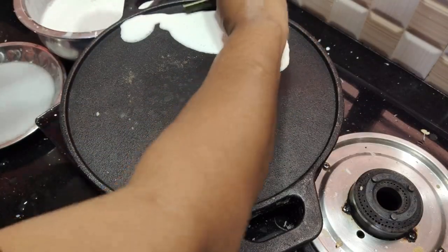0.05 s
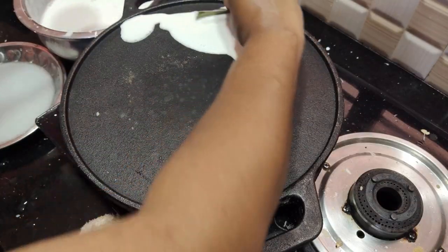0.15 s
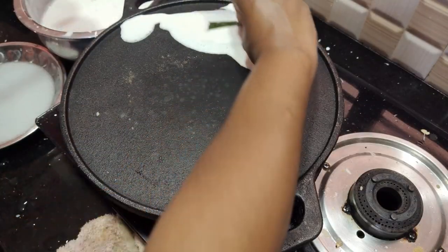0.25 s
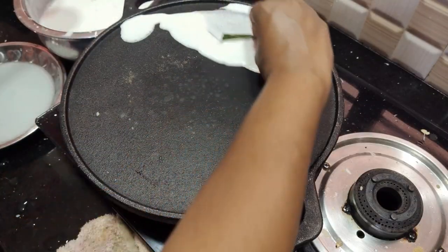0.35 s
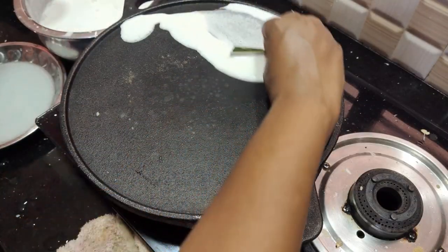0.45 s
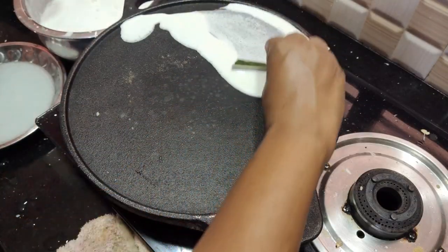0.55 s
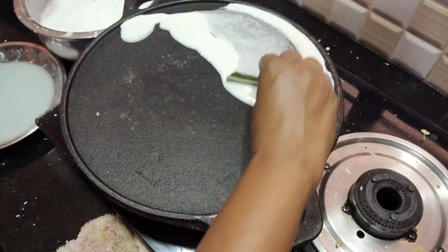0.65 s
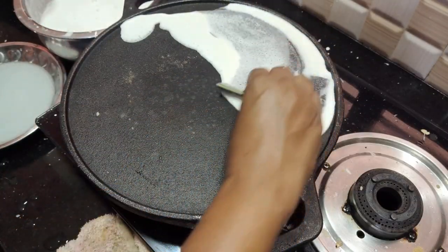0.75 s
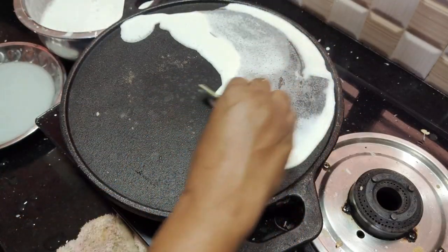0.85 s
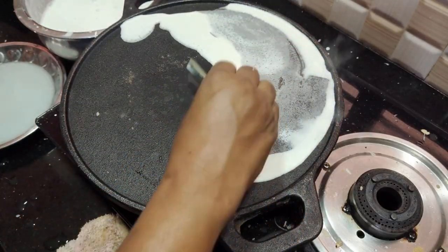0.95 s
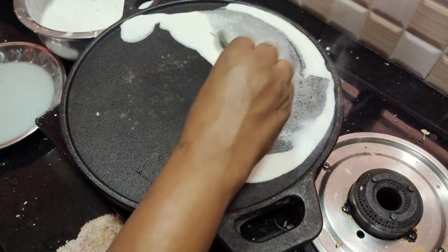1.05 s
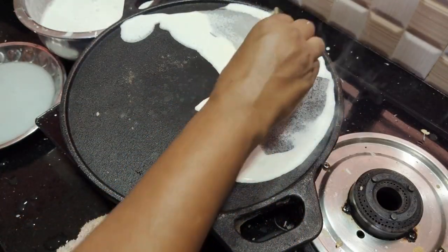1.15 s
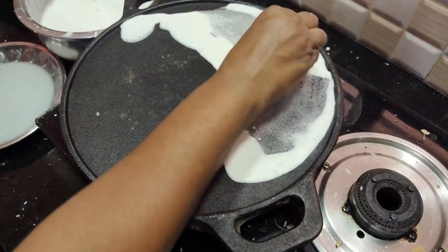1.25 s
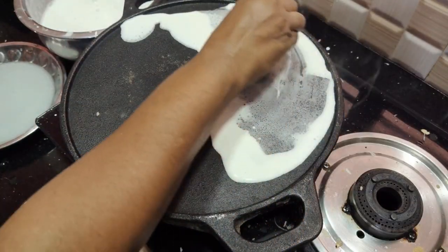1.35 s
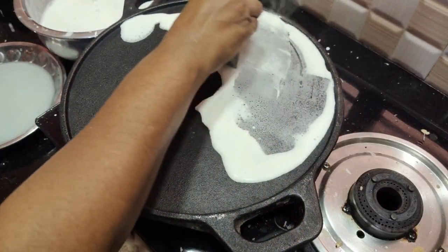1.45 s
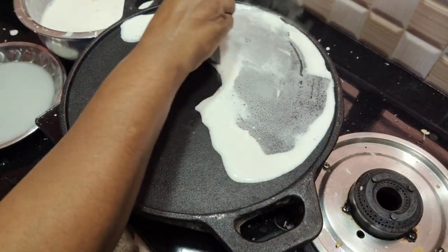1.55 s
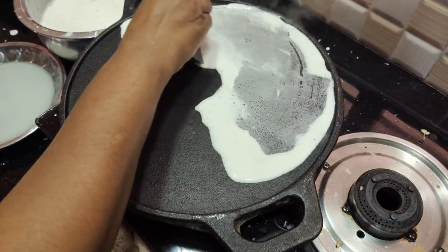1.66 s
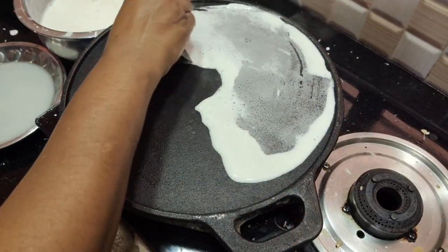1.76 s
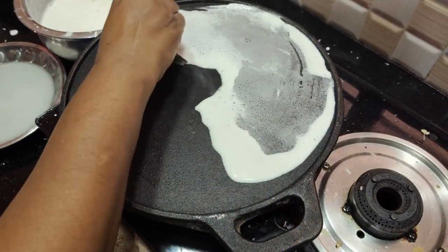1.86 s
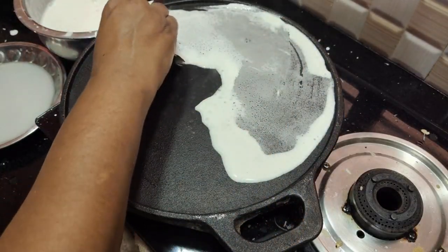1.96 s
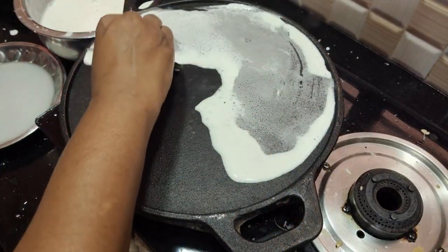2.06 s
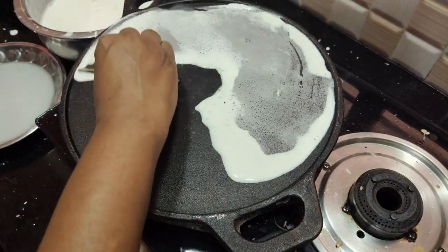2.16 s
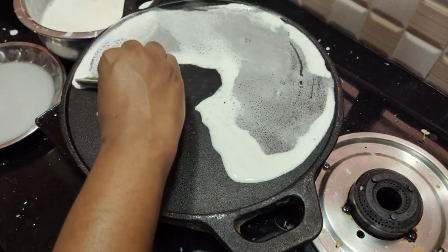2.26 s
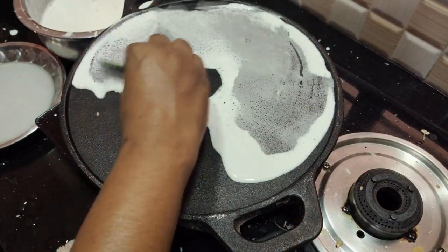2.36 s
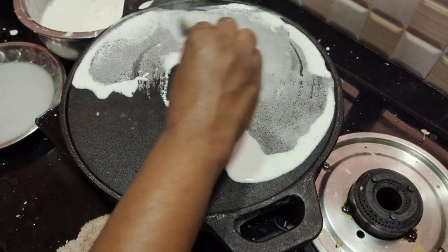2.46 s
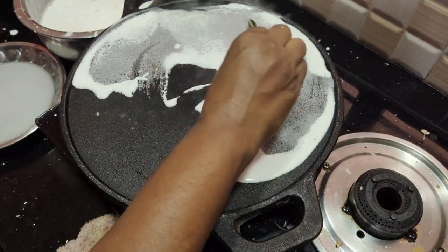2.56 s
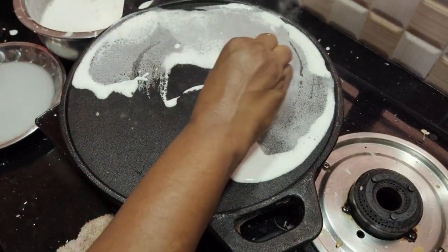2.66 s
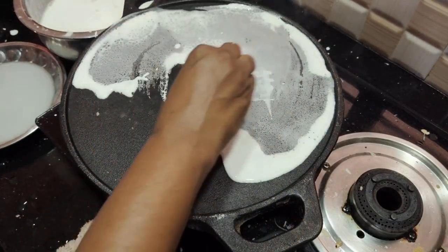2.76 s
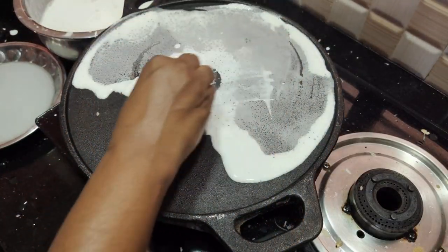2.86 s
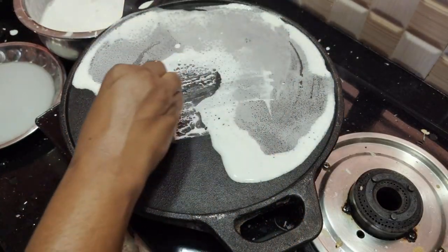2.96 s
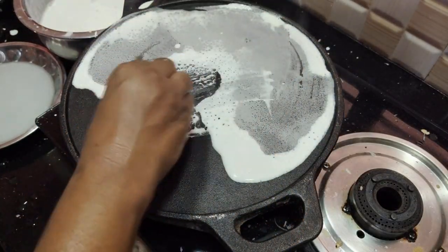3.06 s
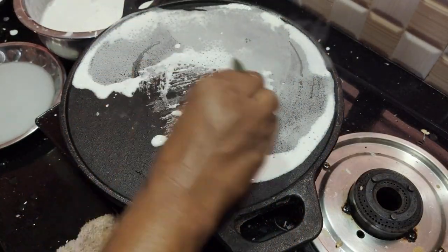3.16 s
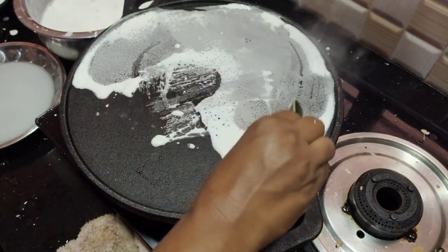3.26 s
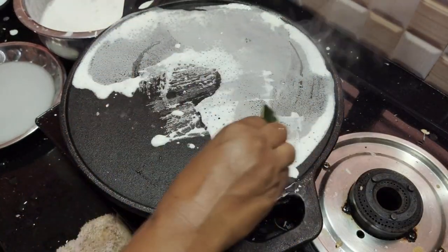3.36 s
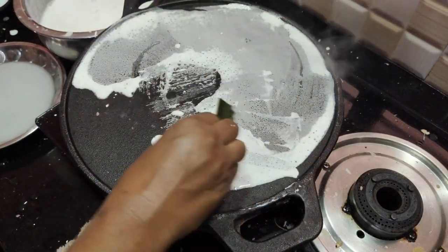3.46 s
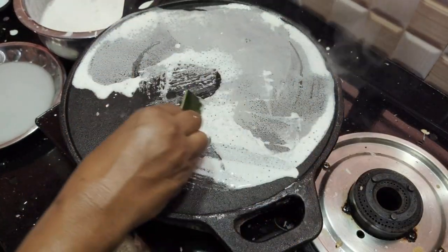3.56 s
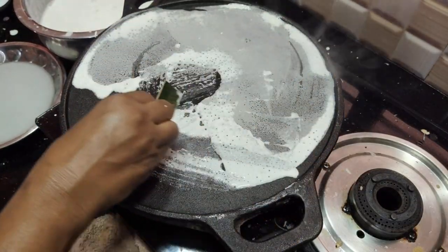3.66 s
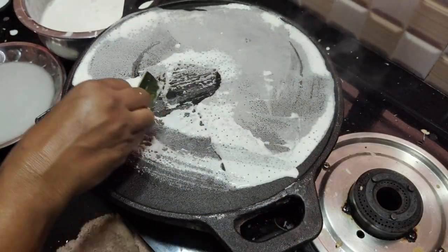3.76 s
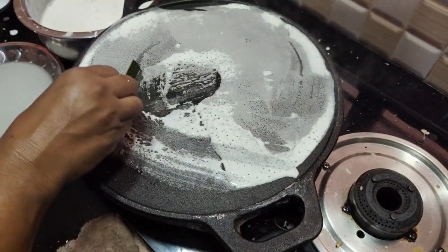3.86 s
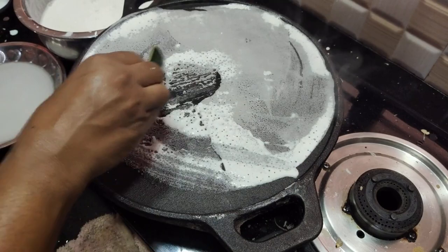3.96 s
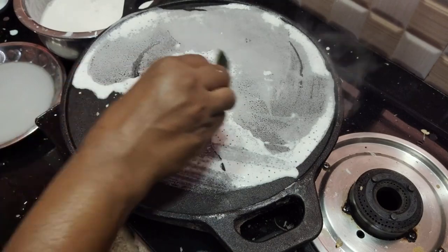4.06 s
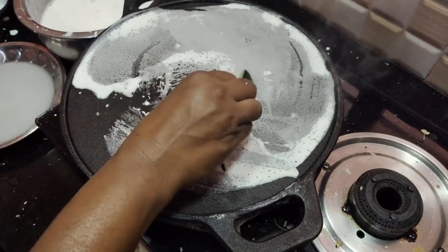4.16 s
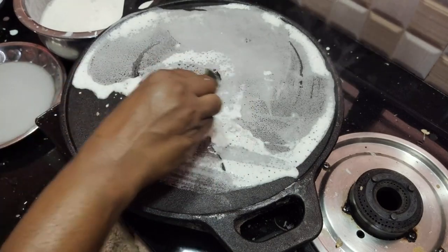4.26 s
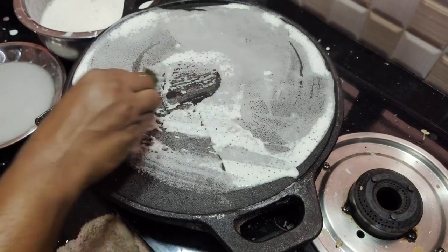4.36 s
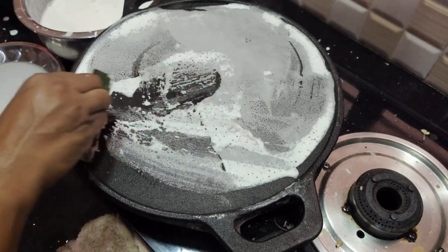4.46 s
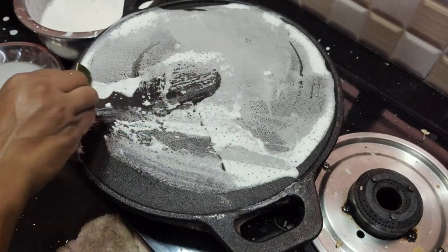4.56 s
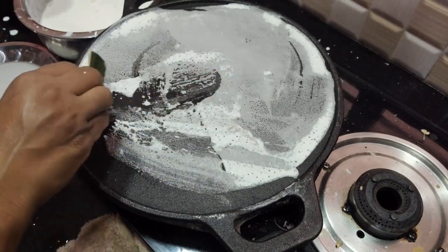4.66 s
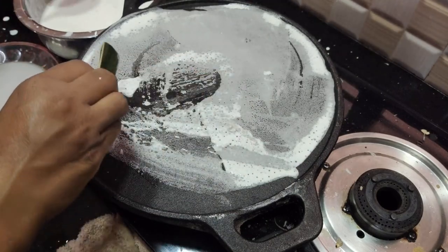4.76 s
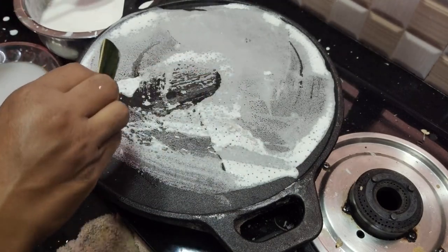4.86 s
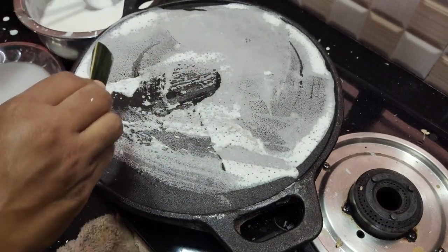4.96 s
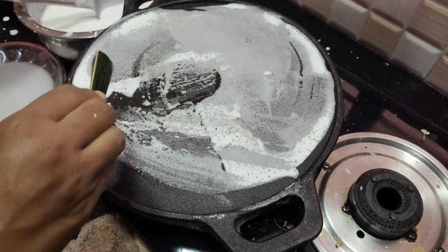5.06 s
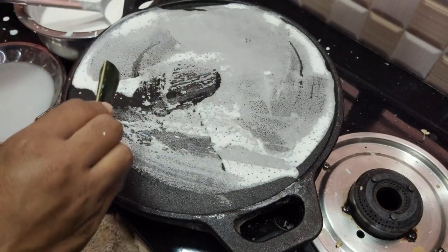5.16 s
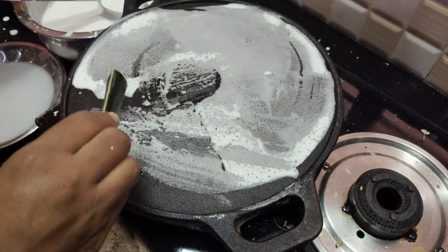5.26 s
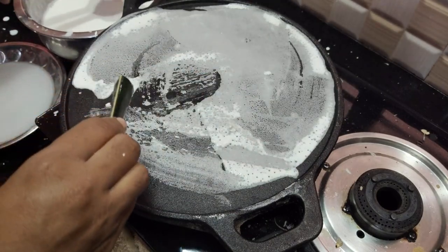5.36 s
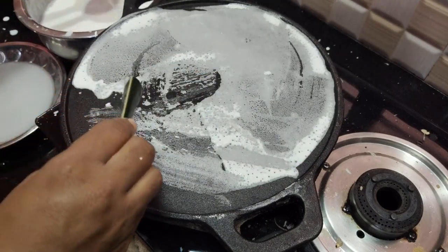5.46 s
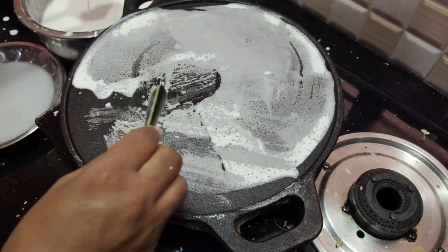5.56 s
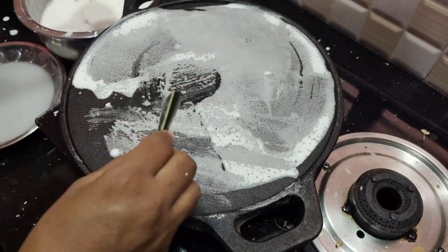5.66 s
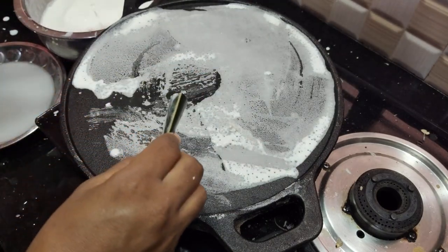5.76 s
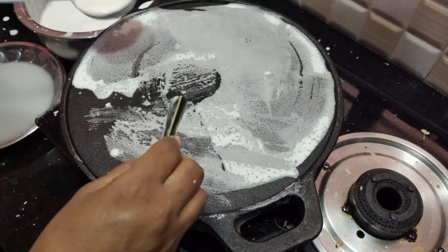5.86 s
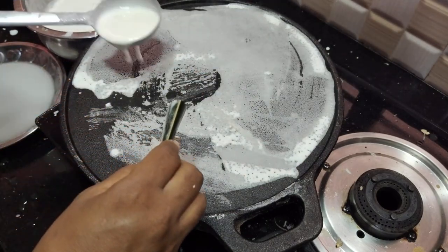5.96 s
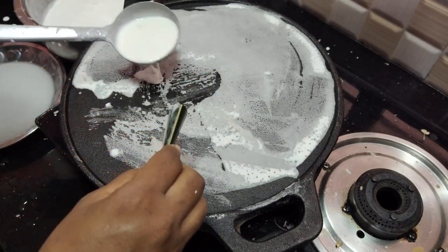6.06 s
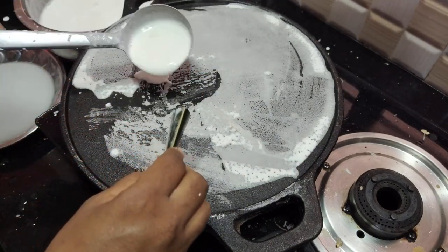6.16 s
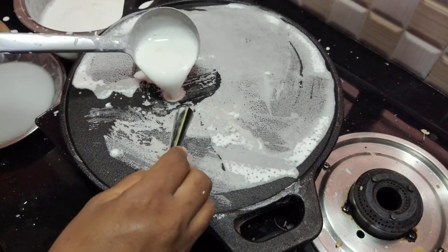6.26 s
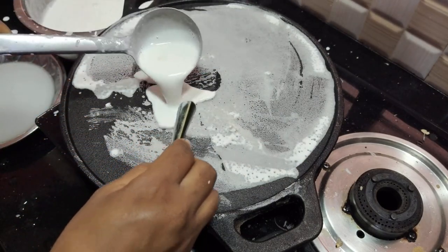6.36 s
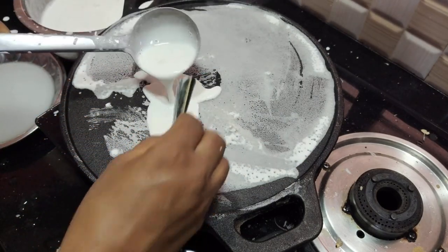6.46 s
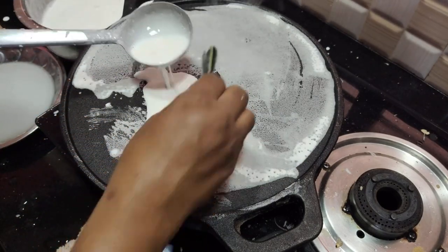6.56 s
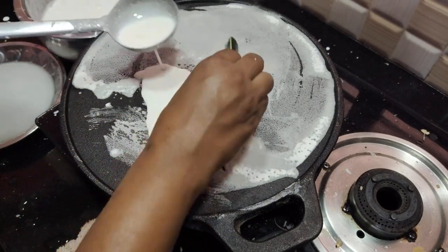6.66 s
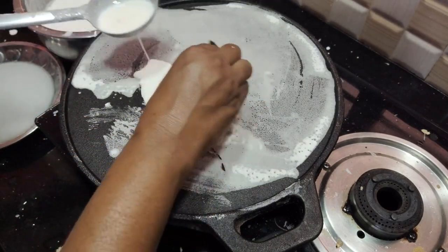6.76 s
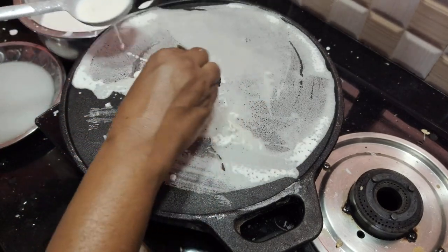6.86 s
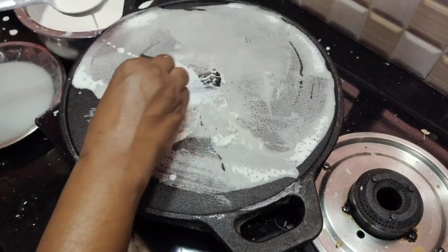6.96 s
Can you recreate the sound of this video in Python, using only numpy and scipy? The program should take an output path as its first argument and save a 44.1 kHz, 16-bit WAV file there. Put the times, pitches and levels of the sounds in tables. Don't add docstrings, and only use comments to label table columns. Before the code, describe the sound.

Sharp steamy hisses flare with each stroke across a hot pan, then fade into sparse ticking and spitting over a low burner murmur.

```python
import sys
import numpy as np
from scipy import signal
from scipy.fft import rfft, irfft, next_fast_len
from scipy.io import wavfile
from scipy.ndimage import uniform_filter1d, map_coordinates

SR = 44100
rng = np.random.default_rng(int(sys.argv[2]) if len(sys.argv) > 2 else 0)


def ratio(d):
    e = np.asarray(d, float) / 20
    return 10 ** e


def pcm_store(signal):
    levels = np.round(np.clip(np.atleast_2d(signal), -1, 1) * 32767)
    wavfile.write(sys.argv[1], SR, levels.astype(np.int16).T)


N = 309582
TIME_S = np.arange(N) / SR


def unit(x):
    return x / np.sqrt(np.mean(x ** 2) + 1e-20)


def along(points, hz):
    point_hz, value = np.transpose(points)
    return np.interp(np.log(hz + 1), np.log(point_hz + 1), value)


def curves(rows):
    start_s, *columns = np.transpose(rows)
    return [np.interp(TIME_S, start_s, column) for column in columns]


def wobble(knots_hz):
    knots = rng.standard_normal(int(N * knots_hz / SR) + 4)
    return map_coordinates(knots, [np.arange(N) * knots_hz / SR])


def filtered(x, response):
    size = next_fast_len(N + 8192)
    spectrum = rfft(x, size) * response(np.fft.rfftfreq(size, 1 / SR))
    return irfft(spectrum, size)[..., :N]


def patchy(depth_db):
    z = signal.stft(rng.standard_normal((2, N)), nperseg=512)[2]
    field = uniform_filter1d(rng.standard_normal(z.shape[1:]), size=8, axis=0)
    field = uniform_filter1d(field, size=8, axis=1)
    return signal.istft(z * ratio(depth_db * unit(field)), nperseg=512)[1][:, :N]


# [pitch_hz, correlation]
ALIKE = [(40, .05), (90, 0.49), (130, 0.63), (220, 0.92), (400, 0.88), (800, 0.43), (1500, 0.29),
         (2500, 0.35), (6300, 0.028), (7200, 0.39), (8000, 0.93), (9300, 0.72), (10500, 0.83),
         (12500, 0.28), (15500, 0.62)]


def stereo(pair, gain):
    def mid_side(hz):
        turn = np.arccos(np.clip(along(ALIKE, hz), -1, 1)) / 2
        return gain(hz) * [np.cos(turn), np.sin(turn)]
    mid, side = filtered(pair, mid_side)
    return unit(np.array([mid + side, mid - side]))


# [start_s, left_late_samples, pan_db (left-right)]
SPOT = [(0, 5.5, 0.5), (.5, -3, -4.5), (.95, -1, 2), (1.8, -0.5, -1), (2.2, 5, -2.5), (2.5, 7.5, -5.5),
        (3.2, 1, -0.5), (4.5, 9, -4.5), (5.5, 8, -2.5), (6.2, 7, -6.5), (7.02, 11, -3)]


def late(pair):
    half, n = curves(SPOT)[0] / 2, np.arange(N)
    left = map_coordinates(pair[0], [n - half])
    right = map_coordinates(pair[1], [n + half])
    return np.array([left, right])


# [pitch_hz, width_hz, level_db]
HOLLOW = [(219.6, 25, -4.5), (326, 14.5, -0.5), (383, 19.3, -1.5), (453.7, 13.5, -2.5), (526, 40, -8.5),
          (556, 32, -14), (727, 63, -11.5), (826, 57, -12.5), (1191, 38, -4), (1240, 31, -9)]
# [pitch_hz, level_db (per Hz)]
KITCHEN = [(88, -34), (150, -1), (216, -4), (270, -2), (319, -3.5), (975, -9), (1200, -10), (1340, -9.5),
           (2500, -13), (3250, -35), (5500, -120)]
DEEP = [(15, -60), (25, -30), (50, -16), (80, -8.5), (100, 0), (125, -0.5), (160, -10), (220, -54)]


def burner():
    def ring(hz):
        return np.sqrt(sum(ratio(2 * level_db) / (1 + (2 * (hz - pitch_hz) / width_hz) ** 2) ** 2
                           for pitch_hz, width_hz, level_db in HOLLOW))
    hollow = ratio(-58 + 0.92 * wobble(2.91)) * stereo(patchy(3.1), ring)
    room = ratio(-59 + 0.92 * wobble(2.2)) * stereo(patchy(3.9), lambda hz: ratio(along(KITCHEN, hz)))
    deep_db = -71.5 - 0.68 * TIME_S + 2.5 * wobble(21)
    deep = ratio(deep_db) * stereo(patchy(1.1), lambda hz: ratio(along(DEEP, hz)))
    above_rumble = filtered(hollow + room, lambda hz: 1 / (1 + (165 / (hz + 1)) ** 8))
    return above_rumble + deep


# [start_s, contact_s, level_db (fizz at lift), swell_db (in contact), abruptness (of edges)]
STROKES = [(.11, 0.026, -43.5, 0, 7), (.17, 0.057, -43, 1, 0.75), (.46, 0.15, -36.5, 2.5, 1.06),
           (.55, 0.033, -37, 1, 3.7), (.6, 0.37, -28.5, 8, 1.03), (1.02, 0.066, -33, -1.5, 1.1),
           (1.16, 1, -46.5, -9.5, 0.79), (1.79, 0.19, -36, 3, 1.15), (2.1, 0.095, -32, 3, 0.6),
           (2.28, 0.087, -33, 0.5, 0.78), (2.67, 0.024, -63, 1, 1.5), (2.89, 0.12, -36.5, 6.5, 10),
           (3.0, 0.096, -33.5, -2.5, 4.3), (3.11, 0.15, -39.5, 1.5, 1.4), (3.42, 0.054, -47, -4, 0.6),
           (3.6, 0.055, -30, 0.5, 1.53), (3.72, 0.23, -33, -2.5, 0.81), (4.06, 0.24, -44.5, 5, 1.2),
           (4.5, 0.065, -34.5, 3, 1.02), (4.72, 0.089, -47.5, 6, 2.5), (4.99, 0.22, -45.5, 0.5, 2.7),
           (5.31, 0.028, -50.5, -5.5, 1.6), (5.44, .05, -56, -4, 1.6), (5.62, 0.059, -47.5, 0, 4.4),
           (5.72, 0.035, -49, 2, 3), (5.81, .02, -48.5, 2, 3), (5.92, 0.14, -48.5, 1.5, 1.5),
           (6.1, 0.039, -42.5, 12, 3), (6.28, .1, -51.5, -4, 1.8), (6.48, 0.043, -49.5, -2, 1.9),
           (6.68, 0.036, -53, -2, 2), (6.87, 0.059, -48.5, 0, 2)]


def flash_db():
    rise_db_per_s, fall_db_per_s = 96, 71
    t = np.arange(0, N + 64, 64) / SR
    power = ratio(2 * (-46.5 - 0.22 * t))
    for start_s, contact_s, level_db, swell_db, abruptness in STROKES:
        held_db = level_db - swell_db * np.clip(1 - (t - start_s) / contact_s, 0, 1)
        before_s = np.clip(start_s - t, 0, 9)
        after_s = np.clip(t - start_s - contact_s, 0, 9)
        edge_db = rise_db_per_s * before_s + fall_db_per_s * after_s
        power = power + ratio(2 * (held_db - abruptness * edge_db))
    return np.interp(TIME_S, t, 10 * np.log10(power))


def bursts(rate_hz, spread_db, life_s):
    chance = rate_hz / SR * ratio(2.4 * wobble(25))
    sizes = (rng.random(N) < chance) * ratio(2 * spread_db * rng.exponential(size=N).clip(0, 4))
    power = signal.lfilter([1], [1, -np.exp(-1 / (life_s * SR))], sizes)
    return power / power.mean()


# [start_s, wet_db (boil over fizz), thickness (0-1), trapped_db (steam under the hand)]
BATTER = [(0, 1.5, 0.44, 1.5), (.3, -2, 0.27, 0.5), (.52, -10.5, 0.27, -1.5), (.72, -4.5, 0.23, 1),
          (.96, -15.5, 0.44, 1.5), (1.2, -7, 0.18, 3.5), (1.79, -10.5, 0.36, -0.5), (1.98, -6, 0.17, 0),
          (2.3, -13, 0.28, 1), (2.48, -15.5, 0.28, 2.5), (2.82, -9, 0.2, 1.5), (3.05, -22, 0.36, -1),
          (3.51, -15, 0.04, 4.5), (3.63, -12, 0.19, 1.5), (3.95, -17.5, 0.14, 1.5), (4.4, -14, 0.4, 3),
          (4.6, -22, 0.16, 2), (7.02, -13, 0.5, 0.5)]
# [pitch_hz, level_db (per Hz)]
BOIL = [(300, -20), (550, -10.5), (700, -3), (900, 1), (1150, -1.5), (1400, -2), (2000, -17), (3500, -60)]
SEETHE = [(600, -60), (1150, -19), (1400, 0.5), (1550, -3), (1800, 1), (2300, -1), (2900, -5.5),
          (5000, -54)]
STEAM = [(1200, -62), (2000, -11.5), (2700, -2.5), (4000, 0), (5500, -5), (6500, -3), (9000, -49)]
FIZZ = [(3500, -24), (5200, -12), (6400, -6.5), (7300, 0.5), (8200, 1), (8900, -2), (9700, -6.5),
        (11000, -14.5), (14000, -36)]
SPRAY = [(7000, -60), (9500, -0.5), (10500, 0.5), (11800, 2.5), (12900, 5), (14000, 2.5), (15500, -1),
         (17000, -32)]


def sizzle():
    fizz_db, (wet_db, thickness, trapped_db) = flash_db(), curves(BATTER)
    spot_db = curves(SPOT)[1]
    thickness = np.clip(thickness, .01, .99)
    boil_db = fizz_db + wet_db + 10 * np.log10(thickness)
    seethe_db = fizz_db + wet_db + 10 * np.log10(1 - thickness)
    steam_db = fizz_db - 4.5 + 0.35 * wet_db + trapped_db
    spray_db = fizz_db - 8 - 0.11 * wet_db + 0.3 * np.minimum(TIME_S, 4.5)
    spray_db = spray_db - 0.3 * spot_db

    bubble_share = np.clip(.45 - 0.017 * (fizz_db + 54), .05, .9)
    bubbles = bursts(rate_hz=700, spread_db=3.3, life_s=.0005)
    flutter = 0.49 * wobble(24) + 0.47 * wobble(35) + 3 * bubble_share * wobble(45)
    layers = []
    for level_db, colour, grainy, flutter_db, patch_db in [
            (boil_db, BOIL, .2, .4, 1.6),
            (seethe_db, SEETHE, .3, .4, 1.6),
            (steam_db, STEAM, .55, .7, 1.4),
            (fizz_db, FIZZ, .95, .9, 1.1),
            (spray_db, SPRAY, .98, .95, 1.3)]:
        grain = np.sqrt(1 + np.clip(grainy * bubble_share, 0, 1) * (bubbles - 1))
        layer = stereo(grain * patchy(patch_db), lambda hz: ratio(along(colour, hz)) * (hz > 300))
        layers.append(ratio(level_db + flutter_db * flutter + 0.32 * wobble(14)) * layer)
    total = late(sum(layers[:3])) + sum(layers[3:])
    pan_db = spot_db + 1.3 * wobble(10)
    return total * ratio(0.28 * np.array([pan_db, -pan_db]))


# [centre_s, length_s, first_hz, last_hz, level_db]
POCKETS = [(.1, .3, 1350, 1500, -53), (.27, 0.17, 1500, 1397, -56), (.25, 0.22, 1800, 1770, -53),
           (.66, .16, 1850, 1950, -50), (.76, .16, 2000, 1720, -48), (.84, .08, 1750, 1700, -53),
           (1.03, .2, 2900, 2510, -47), (1.35, 0.11, 1700, 1590, -53), (1.97, .3, 1850, 1750, -47),
           (2.13, .14, 2150, 1750, -53), (2.25, 0.25, 1350, 1253, -52), (2.9, .08, 2000, 1895, -57),
           (3.01, 0.088, 1700, 1645, -56), (3.43, .05, 2100, 1890, -62), (3.63, 0.11, 2400, 2190, -43.5),
           (3.72, 0.25, 1450, 1397, -51), (4.47, 0.11, 1700, 1590, -58)]


def pockets():
    width_hz, side_gain = 220, 0.58
    lead = SR // 2
    out = np.zeros((2, N + SR))
    fuzz = np.array([wobble(width_hz) + 1j * wobble(width_hz) for _ in range(2)])
    for k, (centre_s, length_s, first_hz, last_hz, level_db) in enumerate(POCKETS):
        u = np.arange(round(length_s * SR)) / (length_s * SR)
        turns = np.cumsum(first_hz + (last_hz - first_hz) * u) / SR
        piece = fuzz[:, k * (SR // 3):][:, :len(u)]
        band = (piece * np.exp(2j * np.pi * turns)).real
        mid, side = band * np.sin(np.pi * u) * ratio(level_db)
        start = round((centre_s + .5 - length_s / 2) * SR)
        out[:, start:start + len(u)] += [mid + side_gain * side, mid - side_gain * side]
    return late(out[:, lead:][:, :N])


# [start_s, peak_db, pan_db (left-right)]
POPS = [(1.5321, -26, 4), (1.7656, -24, 0), (2.6699, -25, 3), (2.7068, -31, 1), (2.8387, -27, -3),
        (2.8529, -29, 3), (4.1762, -26, 3), (4.2278, -26, 2), (4.2776, -28, -1), (4.3077, -27, 4),
        (4.9882, -29, -2), (5.0046, -25, -3), (5.0173, -28, 2), (5.1275, -26, 1), (5.2221, -29, 0),
        (5.286, -27, -1), (5.366, -30, 0), (5.3875, -26, -2), (5.4622, -30, 1), (5.4999, -31, 2),
        (5.526, -28, 0), (5.5793, -31, -1), (5.6107, -28, 3), (5.7307, -26, 1), (5.7558, -25, -3),
        (5.7682, -29, -2), (5.8012, -28, 1), (5.8257, -24, 2), (5.916, -27, -1), (5.9702, -28, 1),
        (5.9785, -27, -1), (6.0156, -28, -2), (6.0433, -24, 0), (6.0769, -26, -3), (6.183, -26, 0),
        (6.2235, -31, -7), (6.3681, -31, -1), (6.4897, -26, 0), (6.6083, -22, -10), (6.6471, -31, 1),
        (6.7671, -25, -3), (6.809, -28, 0),
        (1.707, -26, 3), (4.0944, -25, 0), (4.3585, -30, 0), (4.7004, -26, 1), (4.9532, -30, 0),
         (5.1193, -28, 1), (5.6047, -29, 2), (5.7179, -28, 0), (6.1035, -26, -2), (6.1134, -25, -2),
         (6.1274, -25, -2), (6.5086, -28, 0), (6.5214, -27, 0), (6.6054, -26, 1), (6.8625, -29, 0),
         (6.8758, -30, 0), (6.945, -30, 0)]


def crackle():
    from_s, base_db, spread_db = 4.8, -37.5, 2.4
    luck = rng.random((90, 3))
    start_s = from_s + (N / SR - from_s) * luck[:, 0] ** 1.3
    peak_db = base_db - spread_db * np.log(luck[:, 1]).clip(-2)
    pan_db = 8 * luck[:, 2] - 3
    return np.transpose([start_s, peak_db, pan_db])


def pops():
    out, t = np.zeros((2, N + SR)), np.arange(SR // 50) / SR
    every = np.array(sorted(map(tuple, [*POPS, *crackle()])))
    tail = 0.16 * ratio(-60 * t / 0.008) + 0.15 * ratio(-60 * t / 0.04)
    for start_s, peak_db, _ in every:
        spit = rng.standard_normal((2, len(t))) * tail
        spit[:, 0] = [1.25, .2 * rng.choice([-1, 1])]
        out[:, round((start_s + .001) * SR):][:, :len(t)] += ratio(peak_db) * spit

    def colour(hz):
        fizz = ratio(2 * along(FIZZ, hz))
        spray = ratio(2 * along(SPRAY, hz) - 18)
        steam = ratio(2 * along(STEAM, hz) - 32)
        return np.sqrt(fizz + spray + steam)
    side_db = .3 * curves(every)[1] * np.array([[1], [-1]])
    return ratio(-54 + side_db) * stereo(out[:, :N], colour)


# [start_s, peak_db]
BUMPS = [
    (2.506, -39),
    (2.525, -38),
]
# [pitch_hz, level_db, t60_s]
PAN = [(189, -2.5, 0.12), (289, 0, 0.15), (756, 3, 0.042)]


def bump():
    out, t = np.zeros(N), np.arange(SR // 5) / SR
    for start_s, peak_db in BUMPS:
        ring = 0
        for pitch_hz, level_db, t60_s in PAN:
            decay = ratio(level_db + rng.normal(0, 1.5) - 60 * t / t60_s)
            ring = ring + decay * np.sin(2 * np.pi * pitch_hz * t)
        out[round(start_s * SR):][:len(t)] += ratio(peak_db - 3.5) * ring * (1 - np.exp(-t / 0.0034))
    return out


# [pitch_hz, width_hz, depth_db]
NULLS = [(267, 31, -4), (420, 18, -2), (489, 21, 0), (577, 25, -2.5), (950, 112, -4.5), (1076, 44, 0)]


def scene():
    def null(hz):
        return ratio(sum(depth_db / (1 + (2 * (hz - pitch_hz) / width_hz) ** 2)
                       for pitch_hz, width_hz, depth_db in NULLS))
    return filtered(sizzle() + pops() + burner() + pockets(), null) + bump()


# [start_s, treble (0-1), upper_middle (0-1.6)]
DROPOUTS = [(0, .9, .5), (.9, .9, .3), (1.6, 1, .5), (1.95, 1, 1.1), (2.4, 1, 1.1), (2.55, .9, .3),
            (2.85, .9, .2), (2.92, .8, 1.6), (3.3, .5, 1.5), (3.5, .4, .3), (3.9, .6, .7), (4.5, .3, 1.3),
            (5, .15, 1), (7.02, .08, .75)]


def gaps(x, chance, frequency_of_gaps, size, width_hz, span, side_more):
    overlap = size * 3 // 4
    hz, t, z = signal.stft([x[0] + x[1], x[0] - x[1]], SR, nperseg=size, noverlap=overlap)
    band = (hz // width_hz).astype(int)
    frame = (np.arange(len(t)) + rng.integers(span, size=(band.max() + 1, 1))) // span
    luck = np.take_along_axis(rng.random(frame.shape), frame, axis=1)[band]
    odds = along(chance, hz)[:, None] * np.interp(t, np.transpose(DROPOUTS)[0], frequency_of_gaps)
    kept = z * [luck > odds, luck > side_more * odds]
    mid, side = signal.istft(kept, SR, nperseg=size, noverlap=overlap)[1][:, :N] / 2
    return np.array([mid + side, mid - side])


# [pitch_hz, chance]
GAPS = [(8500, 0), (9300, .05), (10000, .2), (10800, .12), (11500, .22), (12800, .03), (14200, .22),
        (14900, .2), (15200, .5), (15600, 1.1)]
LACE = [(1500, 0), (2300, .02), (2800, .05), (3100, .34), (3600, .3), (4200, .26), (5100, .26), (5800, 0)]


def drop_bands(x):
    _, treble, middle = np.transpose(DROPOUTS)
    x = gaps(x, GAPS, treble, size=512, width_hz=690, span=12, side_more=2.2)
    return gaps(x, LACE, middle, size=1024, width_hz=129, span=6, side_more=.5)


# [centre_s, length_s, depth (0-1)]
SHUTS = [(.54, .1, .4), (.64, .1, 1), (.82, .04, 1), (.92, .04, .6), (1.04, .04, 1), (1.13, .05, 1),
         (1.35, .06, .8), (1.86, .06, .4), (2.34, .05, 1), (2.85, .04, .6), (3.7, .2, .93), (4.18, .04, .5),
         (5.76, .07, .85), (6.41, .07, .6), (6.82, .08, .9)]


def wind_filter(x):
    closed = sum(depth * np.clip((length_s / 2 - abs(TIME_S - centre_s)) / .012 + .5, 0, 1)
                 for centre_s, length_s, depth in SHUTS)
    return x - closed * filtered(x, lambda hz: hz < 170)


def band_limit(x):
    return signal.sosfilt(signal.butter(12, 15750, fs=SR, output="sos"), x)


# [pitch_hz, pan_db (left-right)]
PORTS = [(300, 0), (4000, 2.5), (5600, 2.5), (6700, 10), (7400, 6), (7900, -0.5), (8600, -3.5),
         (9300, -0.5), (10500, 3.5), (11700, 4), (12800, 9.5), (13600, 7), (14500, 6), (16000, -22)]


def record(dry):
    half = np.array([[.5], [-.5]])
    ported = filtered(dry, lambda hz: ratio(half * along(PORTS, hz)) * (hz < 15750))
    return band_limit(wind_filter(drop_bands(ported)))


dry = scene()
out = record(dry)
pcm_store(out)
```